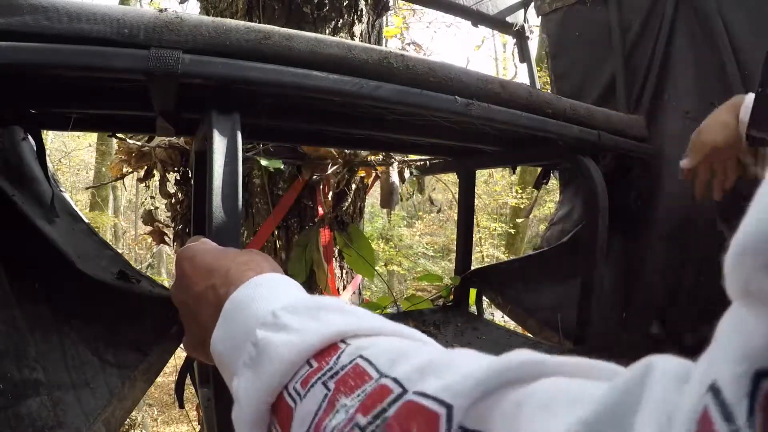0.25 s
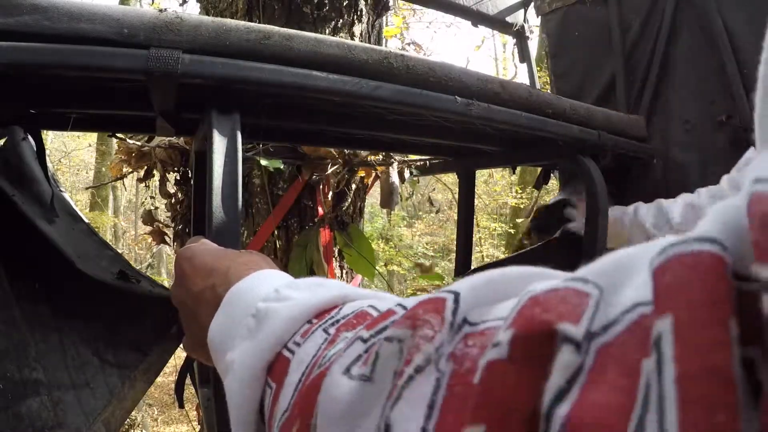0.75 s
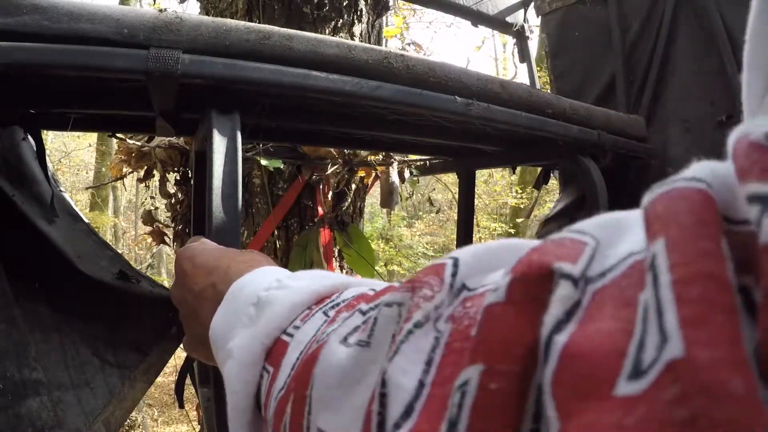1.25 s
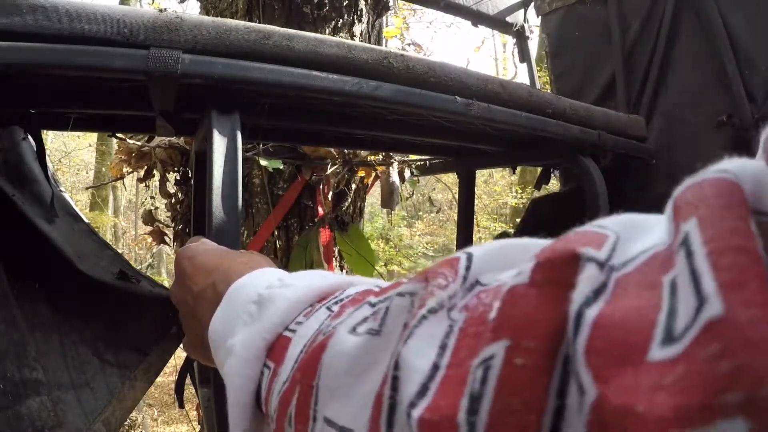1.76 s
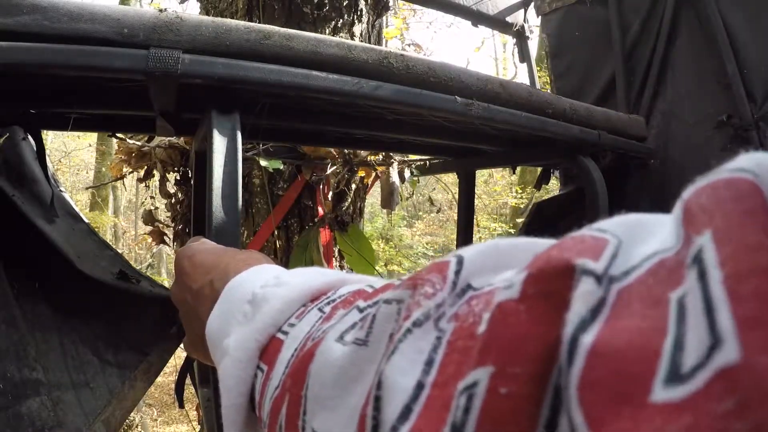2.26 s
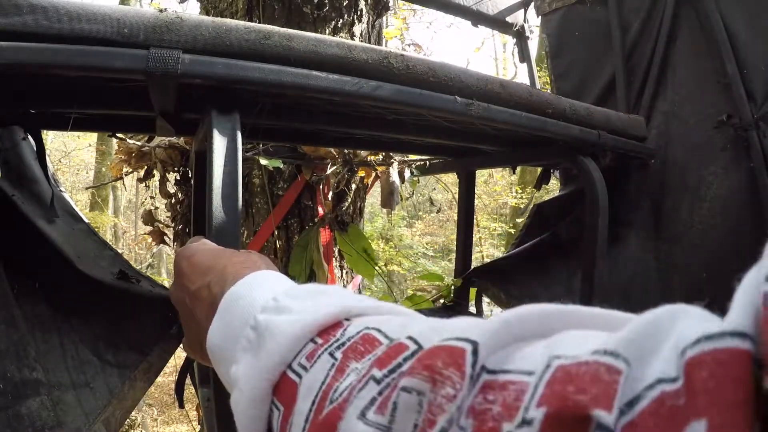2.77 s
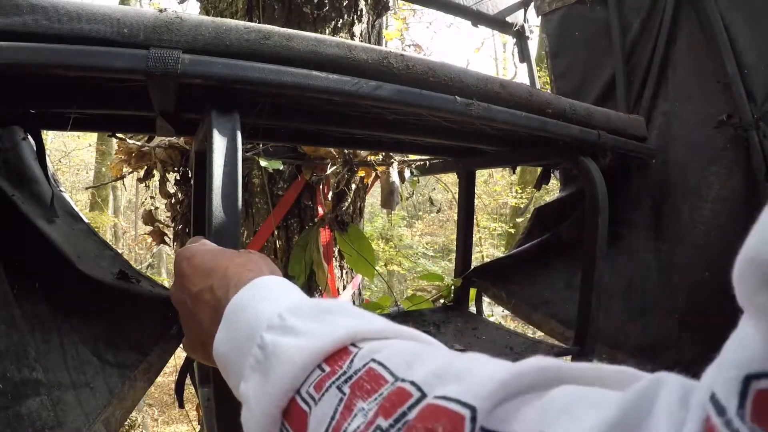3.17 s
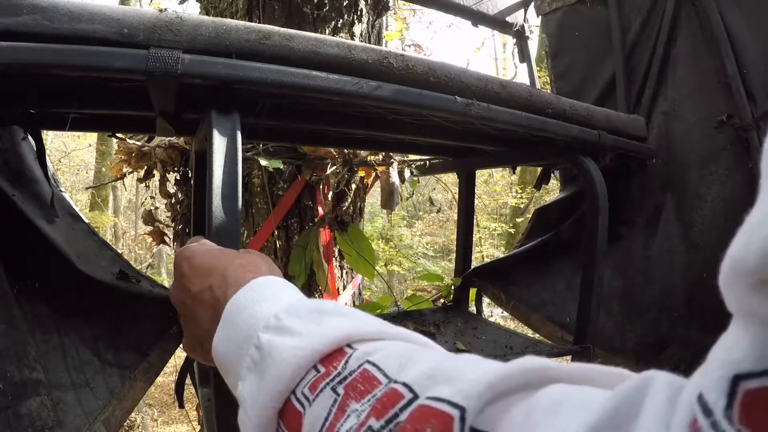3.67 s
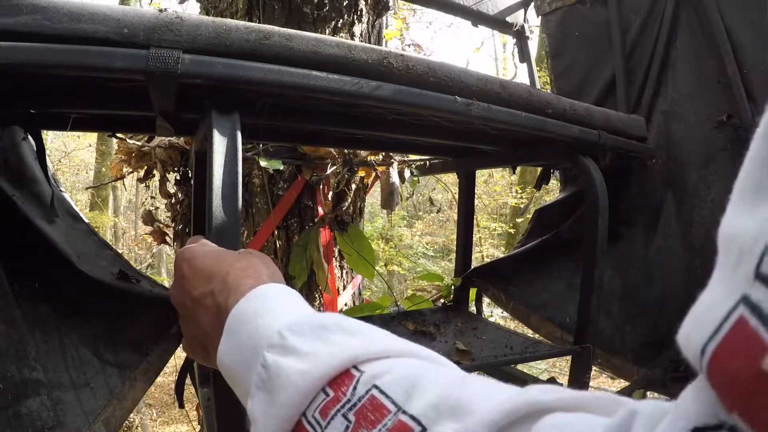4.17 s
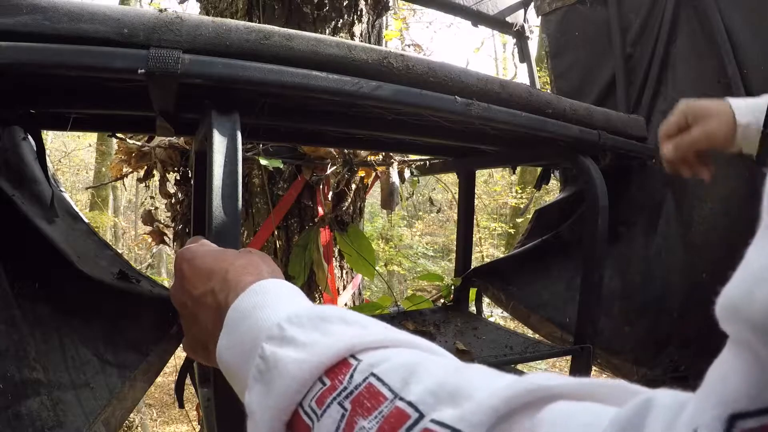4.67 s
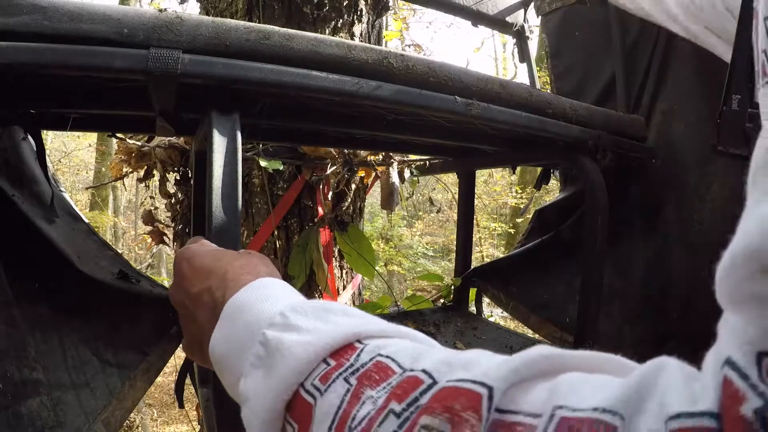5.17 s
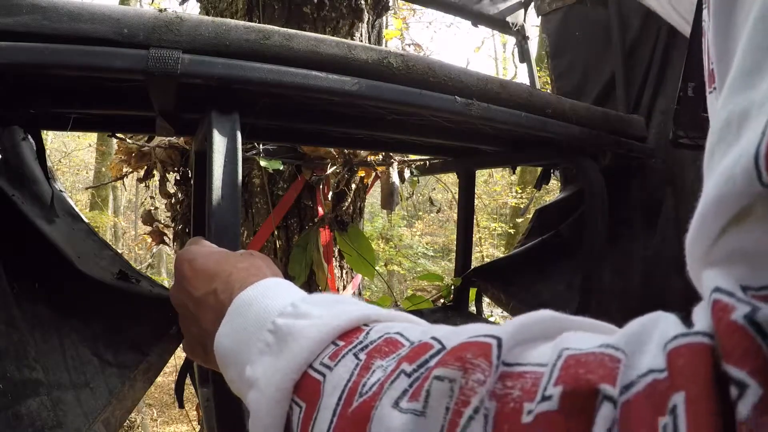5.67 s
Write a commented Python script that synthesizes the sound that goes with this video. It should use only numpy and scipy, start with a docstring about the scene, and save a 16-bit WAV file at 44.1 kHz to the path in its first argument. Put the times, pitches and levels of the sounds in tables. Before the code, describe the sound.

Someone shifts about in a small fabric-walled stand in the woods, cloth swishing and crumpling with irregular snaps, thumps and pauses.

```python
"""Shifting about in a fabric hunting stand

Someone shifts about inside a small fabric-walled stand in the woods, close to the microphone.
Filtered noise and tiny ringing grains make the cloth and dry debris swish, crumple, slip and snap.
Decaying sine waves make knocks thud on the platform; rough wavering tones make the frame scrape,
squeak and groan, a dragged wall panel judder, and a thin whistle sound in the treble.
Low noise rocks the stand, and a faint steady noise is the hush of the woods."""
import sys
import numpy as np
from scipy import signal
from scipy.fft import rfft, irfft, next_fast_len
from scipy.io import wavfile
from scipy.ndimage import uniform_filter1d, map_coordinates

SR = 44100
rng = np.random.default_rng(int(sys.argv[2]) if len(sys.argv) > 2 else 0)


def dump(signal):
    """Clip the signal to [-1, 1] and save it as 16-bit WAV at the path in sys.argv[1]."""
    limited = np.clip(np.atleast_2d(signal).T, -1, 1)
    pcm = np.round(limited * 32767).astype(np.int16)
    wavfile.write(sys.argv[1], SR, pcm)


N = 261072  # length in samples
T = np.arange(N) / SR  # time in seconds


def gain_of(db):
    """Turns decibels into a factor."""
    return 10 ** (np.asarray(db) / 20)


def evened(x):
    """Scales a sound to an average (rms) strength of 1."""
    return x / np.sqrt(np.mean(x ** 2) + 1e-20)


def steadied(x, order):
    """Evens out swells longer than order samples."""
    return x / np.sqrt(uniform_filter1d(x ** 2, order) + 1e-6)


def add(mix, s, sound):
    """Lays a sound into the mix, starting at s seconds."""
    part = mix[max(round(s * SR), 0):][:len(sound)]
    part += sound[:len(part)]


def colour(x, points):
    """Filters x by a curve of (Hz, dB) points, then scales it to rms 1."""
    hz, db = np.transpose(points)
    size = next_fast_len(len(x))
    f = np.fft.rfftfreq(size, 1 / SR)
    curve_db = np.interp(np.log(f + 1), np.log(hz), db)
    return evened(irfft(rfft(x, size) * gain_of(curve_db), size)[:len(x)])


def wander(per_s):
    """Drifts at random between per_s new values a second, of about unit size."""
    knots = np.arange(0, T[-1] + 1, 1 / per_s)
    return np.interp(T, knots, rng.standard_normal(len(knots)))


def swell(start, rise, hold, fall_db_per_s):
    """The power of one movement, 0-1: it builds, holds and dies away."""
    t = T - start
    build = np.clip(t / rise, 0, 1) ** 2
    falling_s = np.clip(t - rise - hold, 0, 2)
    return build * 10 ** (-fall_db_per_s * falling_s / 10)


def grains(per_s, spread_db, low_hz, high_hz, cycles, count=24):
    """Countless tiny creases give way, each ringing for a cycle or so at one of count pitches."""
    happens = rng.random(N) < per_s / SR
    kind = rng.integers(0, count, N)
    strength_db = spread_db * np.minimum(rng.exponential(1, N), 3.5)
    push = gain_of(strength_db) * rng.choice([-1, 1], N) * happens
    out = np.zeros(N)
    for k, hz in enumerate(np.geomspace(low_hz, high_hz, count)):
        r = np.exp(-hz / (cycles * SR))  # how much of the ringing is left after one sample
        turn = 2 * np.pi * hz / SR
        resonator = [1, -2 * r * np.cos(turn), r * r]
        out += (1 - r) * signal.lfilter([1, 0, -1], resonator, push * (kind == k))
    return evened(out)


def burst(hz, decay, rise, octaves, skirt_db):
    """A cluster of tiny breaks: noise in a broad hump of pitch that starts fast and dies away."""
    t = np.arange(4096) / SR
    f = np.fft.rfftfreq(len(t), 1 / SR) + 1
    hump = np.exp(-.5 * (np.log2(f / hz) / octaves) ** 2)
    hump += gain_of(skirt_db) * f / (f + hz) / np.hypot(1, f / 9000)  # weak treble above the hump
    noise = irfft(rfft(rng.standard_normal(len(t))) * hump * 10)
    shape = (1 - np.exp(-t / rise)) ** 2 * np.exp(-t / decay)
    return steadied(noise, order=130) * shape / shape.max()


def patchy(x, tilt, patchy_db, patch_hz, patch_s):
    """Folds form and vanish, each with a passing resonance; tilt is a curve of dB per octave."""
    hz, t, z = signal.stft(x, SR, nperseg=512)
    field = rng.standard_normal((300, 2000))
    where = np.meshgrid(hz / patch_hz, t / patch_s, indexing="ij")
    folds = evened(map_coordinates(field, where, order=1, mode="mirror"))
    depth_db = patchy_db / np.hypot(1, hz / 7000)[:, None]  # high resonances overlap and even out
    tilt_db = np.log2(np.clip(hz, 2000, 13000) / 6500)[:, None] * np.interp(t, T, tilt)
    return signal.istft(z * gain_of(tilt_db + depth_db * folds), SR, nperseg=512)[1][:N]


def stick_slip(rows, jitter, flutter_db, octave_db):
    """A rubbed part catches and slips, singing one rough, unsteady note."""
    s, hz, db = np.transpose(rows)
    pitch = np.interp(T, s, hz) * (1 + jitter * wander(150))
    angle = 2 * np.pi * np.cumsum(pitch) / SR
    note = np.sin(angle) + gain_of(octave_db) * np.sin(2 * angle)
    level_db = np.interp(T, s, db) + flutter_db * wander(70)
    return note * gain_of(level_db) * (T > s[0]) * (T < s[-1])


def movement():
    """Adds strokes to the fidgeting; gives sliding, crumpling and wall levels in dB, and brightness."""
    # Slight shifting that goes on between the strokes, before the trims of each sound.
    # Each row: time in seconds, sliding level in dB, crumpling level in dB.
    fidget = [(0.0, -31, -35.5), (.8, -35.5, -45), (.93, -38.5, -37), (1.1, -44.5, -48.5), (1.42, -48, -50),
              (1.8, -42.5, -39.5), (2.26, -45.5, -51), (2.42, -36, -49.5), (2.63, -44, -51),
              (3.19, -41.5, -43), (3.34, -45.5, -43.5), (3.85, -42.5, -44), (4.12, -51.5, -52),
              (4.88, -51, -54), (5.08, -44.5, -44.5), (5.92, -57, -36)]
    # Strokes of an arm or the body, before the trims of each sound.
    # Each row: start in seconds, rise in seconds, hold in seconds, sliding level in dB,
    # crumpling level in dB, drumming of the wall in dB, brightness in dB per octave.
    strokes = [(0.0, 0.0012, 0.0053, -31.5, -27.5, -26.5, -7), (0.16, 0.0099, 0.02, -22.5, -34, -43, -1.5),
               (0.287, 0.0092, .08, -27.5, -29, -40, 1.5), (0.465, 0.03, 0.045, -28, -26, -31.5, -2),
               (0.558, 0.046, 0.023, -25.5, -23, -31, -2), (0.626, 0.024, 0.056, -28, -39, -25, -5),
               (0.719, 0.054, 0.013, -22, -25, -30.5, -1), (0.821, 0.011, 0.045, -36, -31.5, -45, 0),
               (0.949, .015, 0.045, -45, -58, -30, 5), (1.173, 0.0037, 0.026, -22, -14, -11, -1.5),
               (1.236, 0.021, 0.027, -41, -33, -32, 2), (1.286, 0.019, 0.011, -27.5, -40, -48, 0),
               (1.461, 0.01, 0.023, -22, -42, -19.5, -2.5), (1.487, 0.011, 0.027, -23, -23, -22.5, -4),
               (1.547, 0.039, 0.021, -27, -25, -30, -1), (1.683, 0.0048, 0.0065, -26, -21.5, -23.5, 3),
               (1.69, 0.024, 0.014, -21.5, -29, -39, -2), (1.927, 0.023, .03, -42.5, -35.5, -51, -3),
               (2.462, 0.047, 0.035, -28.5, -35.5, -40.5, -0.5),
               (2.673, 0.015, 0.068, -24, -41.5, -28, 2.5), (2.73, 0.055, 0.098, -22.5, -32.5, -33, -1.3),
               (2.817, 0.052, 0.045, -18.5, -37, -31, .5), (2.906, 0.036, 0.056, -16, -40, -31.5, 1),
               (3.037, 0.027, 0.044, -27.5, -19, -19.5, -4), (3.132, 0.023, 0.03, -42, -29.5, -33, 0),
               (3.419, 0.011, 0.019, -27.5, -36, -38, 2), (3.448, 0.063, 0.043, -19, -34.5, -34.5, 0.5),
               (3.57, 0.036, 0.021, -24.5, -31.5, -29, -0.5), (3.651, 0.046, 0.051, -24, -55, -35.5, 2.5),
               (3.756, 0.017, .025, -33, -52, -41, -1.5), (3.915, 0.029, 0.036, -38.5, -46, -40.5, 1),
               (5.254, 0.058, 0.14, -35.5, -30.5, -36, 3), (5.37, 0.14, 0.18, -22, -23.5, -34, 2.5),
               (5.663, 0.052, 0.14, -19.5, -23, -37, -2.5), (5.856, 0.023, 0.032, -22, -28.5, -30.5, 1.5)]
    # fall in dB per second: folds settle slowest, the wall's drumming stops first
    slide_fall, crumple_fall, wall_fall = 370, 316, 470
    fidget_wall_db, fidget_brightness = -49.5, -1.24  # brightness in dB per octave

    s, slide_db, crumple_db = np.transpose(fidget)
    slide = gain_of(np.interp(T, s, slide_db)) ** 2  # levels add up as powers
    crumple = gain_of(np.interp(T, s, crumple_db)) ** 2
    wall = gain_of(fidget_wall_db) ** 2
    bright = fidget_brightness * slide
    for start, rise, hold, slide_db, crumple_db, wall_db, brightness in strokes:
        stroke = gain_of(slide_db) ** 2 * swell(start, rise, hold, slide_fall)
        slide = slide + stroke
        bright = bright + brightness * stroke
        crumple = crumple + gain_of(crumple_db) ** 2 * swell(start, rise, hold, crumple_fall)
        wall = wall + gain_of(wall_db) ** 2 * swell(start, rise, hold, wall_fall)
    # the stronger movement decides the brightness
    return 10 * np.log10(slide), 10 * np.log10(crumple), 10 * np.log10(wall), bright / slide


def sliding(level_db, brightness, grain_share=0.38, flutter_db=2.0, trim_db=-0.2):
    """Weave rasps over weave in uneven surges; each stroke has its own brightness."""
    # Spectrum of rubbed cloth. Each row: pitch in Hz, level in dB.
    spectrum = [(300, -37), (1000, -8.5), (2000, -3), (3000, -3.5), (4500, -1), (6000, -0.5), (9200, -1),
                (11000, -7.5), (15500, -9)]
    creases = grains(per_s=5000, spread_db=2.5, low_hz=1003, high_hz=16600, cycles=1.75)
    rasp = grain_share * creases + (1 - grain_share) * rng.standard_normal(N)
    hiss = patchy(colour(rasp, spectrum), brightness, patchy_db=3.0, patch_hz=220.4, patch_s=.05)
    return hiss * gain_of(level_db + trim_db + flutter_db * wander(70))


def crumpling(level_db, clump_db=2.0, press_db=-20, trim_db=-0.5):
    """Folds buckle in clumps of dull crackles, which merge into a solid crunch under pressure."""
    # Spectrum of buckling folds. Each row: pitch in Hz, level in dB.
    spectrum = [(80, -18), (200, -7), (300, -3.5), (430, -1), (540, 0.5), (700, 2.5), (850, 0.5),
                (1100, -2.5), (1500, -2.5), (2200, -9), (3500, -9.5), (7000, -21), (15000, -40)]
    loose = grains(per_s=1500, spread_db=3.5, low_hz=179.7, high_hz=8500, cycles=1.74)
    loose = steadied(colour(loose, spectrum), order=1800)
    packed = colour(rng.standard_normal(N), spectrum)
    pressure = 1 / (1 + gain_of(2 * (press_db - level_db)))  # 0-1, half at press_db
    crackle = np.sqrt(1 - pressure) * loose + np.sqrt(pressure) * packed
    return crackle * gain_of(level_db + trim_db + clump_db * wander(110))


def panel(level_db, trim_db=-2.5):
    """The taut wall drums at its low resonance when it is rubbed."""
    # Spectrum of the drumming wall. Each row: pitch in Hz, level in dB.
    spectrum = [(30, -25), (60, -6), (100, -9.5), (142, 0.5), (195, -5.5), (280, -9), (380, -14.5),
                (700, -29), (2000, -65)]
    drumming = steadied(colour(rng.standard_normal(N), spectrum), order=1500)
    return drumming * gain_of(level_db + trim_db)


def woods(level_db=-50):
    """The hush of the woods is steady noise, strongest in a few narrow pitch regions."""
    # Spectrum of the hush. Each row: pitch in Hz, level in dB.
    spectrum = [(24, -26), (40, -23.5), (103, 2.5), (200, -28), (277, -0.5), (554, -12), (956, -10.5),
                (1170, -18), (1320, -24), (15000, -28.5)]
    return gain_of(level_db) * colour(rng.standard_normal(N), spectrum)


def sway(rest_db=-33, trim_db=-2):
    """Each shift of weight rocks the stand, and the microphone with it."""
    # Shifts of weight. Each row: start in seconds, level in dB before the trim.
    pushes = [(0.03, -21.5), (.27, -22.5), (.72, -24), (.94, -9.5), (1.72, -21.5), (2.72, -19.5),
              (3.04, -16.5), (3.48, -14), (4.1, -26.5), (5.28, -25.5), (5.6, -21)]
    # Spectrum of the rocking. Each row: pitch in Hz, level in dB.
    spectrum = [(5, -14.5), (11, -4), (19, -10.5), (25, -9.5), (36, -30), (60, -37.5), (100, -42.5),
                (300, -85)]
    power = gain_of(rest_db) ** 2  # a little rocking never stops
    for s, db in pushes:
        power = power + gain_of(db) ** 2 * swell(s, rise=0.045, hold=0.07, fall_db_per_s=38)
    rumble = steadied(colour(rng.standard_normal(N), spectrum), order=4000)
    return rumble * np.sqrt(power) * gain_of(trim_db)


def snaps(trim_db=1):
    """Single folds and twigs give way with a hollow pop."""
    # Each row: start in seconds, peak level in dB before the trim, centre pitch in Hz,
    # spread in octaves.
    snap_rows = [(0.0117, -9.5, 800, 1.35), (0.2504, -28, 710, 1.2), (0.295, -19, 1360, 1.1),
                 (0.3372, -17.5, 770, 0.39), (0.5421, -18, 730, 0.73), (0.6102, -19, 870, 0.65),
                 (0.6183, -11, 1030, 0.7), (0.6788, -18.5, 765, 1.1), (0.7769, -13, 1930, 1),
                 (1.1617, -22, 790, 0.86), (1.1904, -9, 716, 0.82), (1.201, -14, 730, 0.9),
                 (1.2136, -7, 606, 0.33), (1.4679, -13, 610, 1), (1.5072, -8.5, 795, 0.36),
                 (1.536, -14.5, 1000, 0.29), (1.6917, -27, 800, 0.38), (1.776, -32, 1230, 1),
                 (1.811, -28, 786, 0.73), (1.8596, -31, 1440, 0.69), (1.981, -26.5, 600, 0.57),
                 (2.5071, -20, 1820, 2), (3.05, -18, 560, 1.2), (3.0698, -12, 1520, 1.2),
                 (3.095, -18, 470, 0.72), (3.1186, -17.5, 626, 0.72), (3.2286, -24, 1700, 1.04),
                 (3.3155, -29, 1400, 0.89), (3.364, -31, 1130, 0.44), (3.551, -17.5, 2420, 1),
                 (3.8775, -29, 1110, 1.3), (4.1297, -34.5, 700, 0.89), (4.292, -43, 1680, 0.6),
                 (4.475, -43, 1210, 0.35), (5.3013, -28, 1580, 1.2), (5.329, -21, 1220, 0.64),
                 (5.551, -13, 880, 1.15), (5.624, -16.5, 1130, 1.3), (5.7607, -12.5, 2380, 1.1),
                 (5.81, -10, 1210, 0.86), (5.891, -15, 2580, 1.8)]
    out = np.zeros(N)
    for s, db, hz, octaves in snap_rows:
        pop = burst(hz, decay=0.0028, rise=0.00034, octaves=octaves, skirt_db=-25.5)
        add(out, s, gain_of(db + trim_db) * pop)
    return out


def flicks(trim_db=-1.0):
    """Caught cloth slips free with a short bright zip."""
    # Quick slips of cloth over cloth, each begun 1 ms before its listed time.
    # Each row: time in seconds, peak level in dB before the trim, centre pitch in Hz.
    flick_rows = [(0.0835, -21.5, 5200), (0.1719, -12.5, 4660), (0.47, -23.5, 6280), (0.5, -16, 4000),
                  (0.84, -15.5, 3900), (0.965, -28, 8100), (1.1811, -7.5, 4430), (1.6103, -15.5, 5430),
                  (1.717, -16.5, 5900), (1.9223, -28.5, 7900), (2.1242, -30, 3670), (2.493, -19.5, 7200),
                  (2.7124, -14.5, 6460), (2.7961, -14, 5560), (2.881, -13.5, 4100), (3.003, -13, 8180),
                  (3.042, -18.5, 7000), (3.153, -25.5, 5400), (3.433, -28, 4470), (3.512, -14.5, 6930),
                  (4.372, -34, 7060), (5.4384, -18.5, 7200), (5.7487, -15, 7760), (5.7884, -15.5, 5310),
                  (5.8263, -9.5, 4300)]
    out = np.zeros(N)
    for s, db, hz in flick_rows:
        zip_sound = burst(hz, decay=0.0067, rise=0.00027, octaves=0.69, skirt_db=-27)
        add(out, s - .001, gain_of(db + trim_db) * zip_sound)
    return out


def scrape():
    """A short scrape against the frame sings one rough note as it catches and slips."""
    # Each row: time in seconds, pitch in Hz, level in dB.
    course = [(.57, 790, -45), (.6, 785, -25), (.622, 822, -22), (.64, 848, -31), (.69, 870, -34),
              (.72, 880, -53)]
    return stick_slip(course, jitter=0.073, flutter_db=1.5, octave_db=-28)


def knocks():
    """A blow rings the platform's natural tones, the higher ones building up a little sooner."""
    # Knocks on the platform.
    # Each row: start in seconds, level in dB, brightness in dB per octave.
    blows = [(1.188, -15, 0), (1.21, -23, -3), (1.468, -26, -0.5), (1.502, -35, 7), (3.066, -16, -5.5),
             (3.101, -36, 3.5)]
    # Tones the platform rings with.
    # Each row: pitch in Hz, level in dB added to the blow's, time to fade by 60 dB in seconds.
    platform = [(63, 1.5, 0.078), (78, 15.5, 0.032), (102.4, -5, 0.21), (136.4, -3, 0.18), (173, -13, 0.1),
                (270, 0, 0.063), (350, 7.5, 0.075), (532, 3, 0.11), (568, 0, 0.13), (705, 3, 0.079),
                (810, 3, 0.06), (1335, -3.5, 0.13)]
    t = np.arange(SR // 2) / SR
    out = np.zeros(N)
    for s, level_db, tilt in blows:
        for hz, db, t60 in platform:
            ring = np.sin(2 * np.pi * (hz * t + rng.random())) * (1 - np.exp(-2 * hz * t))
            ring_db = level_db + db + tilt * np.log2(hz / 200) - 60 * t / t60
            add(out, s, gain_of(ring_db) * ring)
    return out


def squeak():
    """The frame squeaks faintly as a rubbed part catches and slips."""
    # Each row: time in seconds, pitch in Hz, level in dB.
    course = [(1.78, 735, -65), (1.85, 753, -32), (1.91, 768, -46), (1.965, 781, -30.5), (2.02, 766, -50),
              (2.13, 715, -68)]
    return stick_slip(course, jitter=0.05, flutter_db=5.5, octave_db=-27)


def groans(edge_db=-16):
    """The settling frame groans low, each groan swelling and fading on one rough note."""
    # Each row: start in seconds, length in seconds, pitch in Hz, level in dB.
    groan_rows = [(2.0, 0.29, 330, -48), (4.18, .06, 334, -45)]
    out = np.zeros(N)
    for s, length, hz, db in groan_rows:
        end_db = db + edge_db  # quieter at both ends
        course = [(s, hz, end_db), (s + length / 5, hz, db),
                  (s + length / 2, hz, db), (s + length, hz, end_db)]
        out += stick_slip(course, jitter=0.1, flutter_db=4, octave_db=-25)
    return out


def judder():
    """The dragged wall panel catches and slips on a low note, sinking as it slows."""
    # Each row: time in seconds, pitch in Hz, level in dB.
    course = [(3.49, 150.1, -44), (3.56, 149, -24), (3.63, 138.6, -20.5), (3.69, 143.2, -25),
              (3.8, 134.6, -30), (3.87, 131, -37)]
    return stick_slip(course, jitter=0.1423, flutter_db=2.5, octave_db=-16)


def whistle():
    """A thin, very faint tone wavers high in the treble."""
    # Each row: time in seconds, pitch in Hz, level in dB.
    course = [(5.03, 11900, -65), (5.1, 12450, -60), (5.13, 12600, -72), (5.2, 12800, -55),
              (5.25, 13400, -52), (5.31, 12700, -68)]
    return stick_slip(course, jitter=.004, flutter_db=2, octave_db=-80)


def shelter(x, near_db=-16, near_t60=0.012, far_db=-21, far_t60=0.61):
    """Close walls answer at once; the trees return a weak, duller tail."""
    t = np.arange(SR // 2) / SR
    happens = (rng.random((2, len(t))) < 2000 / SR) * (t > .001)  # 2000 echoes a second
    near, far = rng.choice([-1, 1], (2, len(t))) * happens
    near = near * gain_of(-60 * t / near_t60)
    far = signal.lfilter([1], [1, -.6], far) * gain_of(-60 * t / far_t60)  # dulled
    echo = gain_of(near_db) * near / np.linalg.norm(near)
    echo += gain_of(far_db) * far / np.linalg.norm(far)
    return x + signal.oaconvolve(x, echo)[:N]


def scene():
    """Mixes the handling and the frame in their shelter with the sounds that get no echo."""
    slide_db, crumple_db, wall_db, brightness = movement()
    cloth = sliding(slide_db, brightness) + crumpling(crumple_db) + panel(wall_db)
    handling = cloth + snaps() + flicks() + knocks()
    frame = scrape() + squeak() + groans()
    return (shelter(handling + frame) + woods() + sway() + judder() + whistle())[None]


def record(dry):
    """Clips whatever goes beyond full scale, then removes the treble above 15.5 kHz."""
    lowpass = signal.firwin(401, 15500, window=("kaiser", 9), fs=SR)
    return signal.oaconvolve(np.clip(dry, -1, 1), lowpass[None], "same")


dry = scene()
out = record(dry)
dump(out)
```